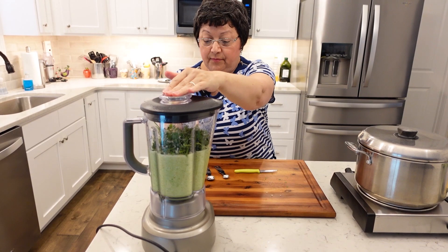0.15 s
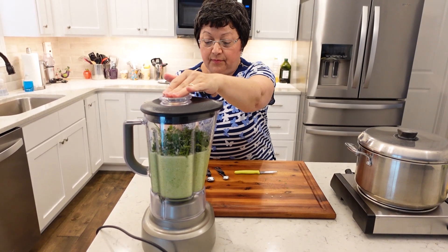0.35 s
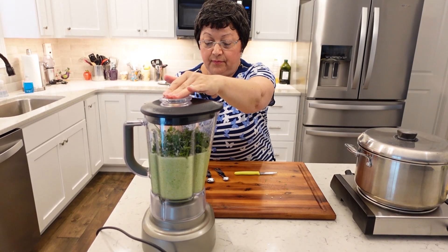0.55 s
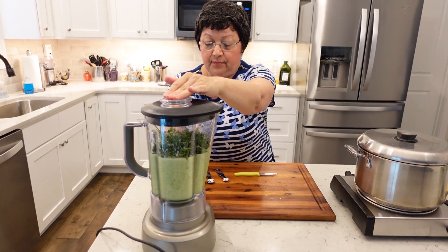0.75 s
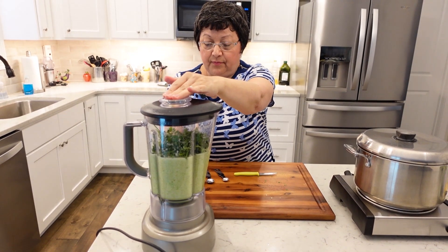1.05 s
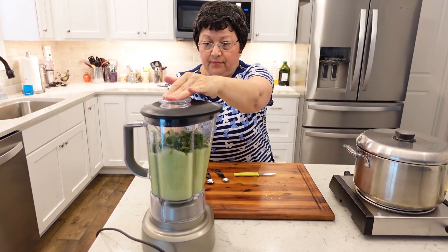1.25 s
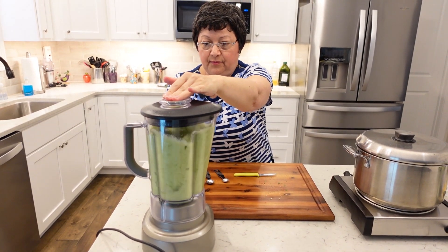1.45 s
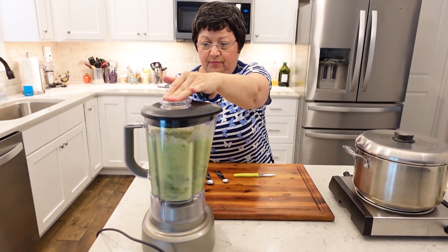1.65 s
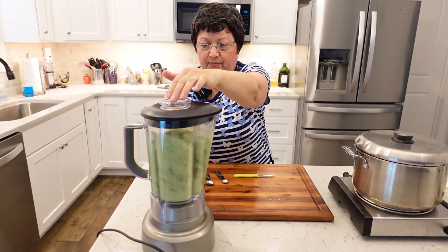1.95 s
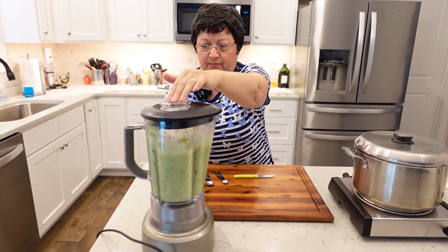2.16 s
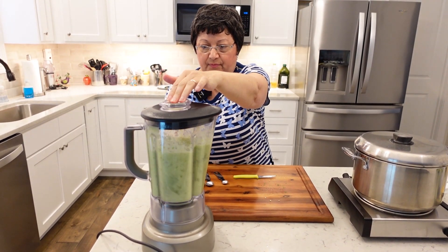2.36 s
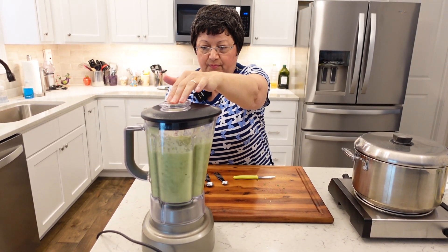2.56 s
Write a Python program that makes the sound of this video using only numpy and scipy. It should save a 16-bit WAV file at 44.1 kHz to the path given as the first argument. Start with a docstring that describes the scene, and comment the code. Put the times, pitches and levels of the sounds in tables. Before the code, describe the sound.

A blender chops wet greens in a kitchen. Soft ventilation murmur and faint hiss until two plastic clicks at 1.0 and 1.1 seconds, the second doubled. At 1.18 the drive knocks in abruptly; rough chopping growls in bursts with gulps and gurgles. Hard knocks and cracks crowd around 1.9 to 2.15, then brighter, steadier churning, splashing spray and a growing motor tone continue to the end.

```python
"""A blender chopping in a kitchen

Over ventilation murmur come two plastic clicks, the second a close pair; then the drive knocks in and blades chop.
Chopping, spray and gulps are filtered random impulses with short rattles; the jar's resonances ring along.
Trapped air rings as gliding sines, hard chunks knock and crack, and motor tones grow. Clumps growl one by one,
then the mash circulates and the sound evens out. A short room tail surrounds most of the sources."""
import sys
import numpy as np
from scipy import signal
from scipy.fft import rfft, irfft
from scipy.io import wavfile
from scipy.ndimage import uniform_filter1d

SR = 44100
rng = np.random.default_rng(int(sys.argv[2]) if len(sys.argv) > 2 else 0)


def put_to_file(sound):
    """Save the sound as 16-bit audio at rate SR, in the file named by the first command-line argument."""
    columns = np.atleast_2d(sound).T  # one column per channel
    safe = np.clip(columns, -1, 1)
    whole_steps = np.round(safe * 32767)
    wavfile.write(sys.argv[1], SR, whole_steps.astype(np.int16))


N = 119070
T = np.arange(N) / SR  # time [s]
START_S = 1.183  # the drive takes up its slack
THIN_S = 2  # the mash begins to thin
RATTLE_S = 0.0039  # amplitude decay time of the rattle after a blow
EAR_LAG_S = 0.001053  # the right microphone hears direct blows later
WET_DB = -5.5  # usual level of the kitchen's tail

# Spectral shape of a hard blow on the drive: (frequency [Hz], relative level [dB])
KNOCK_SHAPE = [(250, -20), (800, -0.5), (1700, 2.5), (2400, -12.5), (3200, -28), (16000, -47)]
# Spectral shape of spray and cracks: (frequency [Hz], relative density [dB per Hz])
SPRAY_SHAPE = [(400, -39.5), (1500, -1), (2800, 0.5), (3500, -6), (4700, -8.5), (7000, -16), (10800, -21.5),
               (16000, -39.5)]


def amp(db):
    """Logarithmic level: decibels become an amplitude gain."""
    return 10 ** (np.asarray(db) / 20)


def unit(x):
    """Normalisation by mean power: scales to rms 1."""
    return x / np.sqrt(np.mean(x ** 2) + 1e-20)


def read(points, hz):
    """Linear interpolation of a table on a log-frequency axis."""
    f, value = np.transpose(points)
    return np.interp(np.log(hz + 1), np.log(f + 1), value)


def conv(x, h):
    """Linear superposition: convolves along time, cut to the scene's length."""
    return signal.fftconvolve(np.atleast_2d(x), np.atleast_2d(h), axes=1)[:, :N]


def colour(x, shape, size=4096):
    """Minimum-phase filtering: the log gain's Hilbert transform gives the phase; impulse energy is 1."""
    hz = abs(np.fft.fftfreq(size, 1 / SR))
    log_gain = np.log(amp(shape(hz)))
    response = np.exp(np.conj(signal.hilbert(log_gain)))
    h = np.fft.ifft(response).real
    return conv(x, h / np.linalg.norm(h))


def tinted(x, points):
    """Source-filter principle: shapes x by the spectrum in a table."""
    return colour(x, lambda hz: read(points, hz))


def resonate(x, hz, width):
    """A damped second-order resonance with peak gain 1."""
    b, a = signal.iirpeak(hz, hz / width, fs=SR)
    return signal.lfilter(b, a, x)


def steadied(x, size=1500):
    """Short-time power normalisation: removes slow level drift and keeps the grain."""
    power = (x ** 2).mean(0)
    local_power = abs(uniform_filter1d(power, size))
    return x / np.sqrt(local_power + 1e-4 * np.mean(x ** 2))


def grains(per_s, spread_db):
    """Shot noise: impulses at random times, of random sign and uneven size."""
    hits = rng.random(N) < per_s / SR
    signs = rng.choice([-1, 1], N)
    return hits * signs * amp(spread_db * np.minimum(rng.exponential(1, N), 4))


def scatter(x, direct, decay_s=RATTLE_S):
    """Direct and diffuse sound: a spike, later and weaker on the right, plus a decaying noise rattle."""
    r = np.exp(-2 / (decay_s * SR))  # power decays twice as fast as amplitude
    power = signal.lfilter([1 - r], [1, -r], x ** 2 + 1e-20)
    rattle = np.sqrt(power) * rng.standard_normal((2, N))
    spike = direct * np.array([[1], [.7]])
    left_right = np.array([x, np.roll(x, round(EAR_LAG_S * SR))])
    return (rattle + spike * left_right) / np.sqrt(1 + spike ** 2)


def impulses(rows):
    """Ideal impulsive excitation: one impulse for each (time [s], level [dB]) row."""
    x = np.zeros(N)
    for s, db in rows:
        x[round(s * SR)] += amp(db)
    return x


def room(x, wet_db=WET_DB):
    """Diffuse reverberation: noise tails whose bands each decay at their own speed."""
    # Reverberation time of the kitchen: (frequency [Hz], T60 [s])
    room_t60 = [(400, 0.21), (5000, 0.37), (16000, 0.07)]
    hz, t, z = signal.stft(rng.standard_normal((2, 2, SR // 2)), SR, nperseg=256)
    decay = amp(-60 * t / read(room_t60, hz)[:, None])
    onset = np.minimum(t / 0.0083, 1)
    tails = signal.istft(z * decay * onset, SR, nperseg=256)[1]
    turn = 2 * np.pi * T  # two tails take turns so that the room does not stand still
    wet = conv(x * np.cos(turn), tails[0]) + conv(x * np.sin(turn), tails[1])
    return x + amp(wet_db) * wet / np.linalg.norm(tails[0, 0])


def jar(x):
    """Forced vibration: jar and base ring along with whatever shakes them."""
    # Resonances of jar and base: (frequency [Hz], width [Hz], gain [dB])
    jar_modes = [(231, 21, 3.5), (506, 84, 6), (889, 16, 2.5), (1014, 70, -6.5), (1246, 64, -4.5),
                 (2700, 140, -13), (4400, 350, -12), (8020, 690, -0.5)]
    return x + sum(amp(db) * resonate(x, hz, width) for hz, width, db in jar_modes)


def level(column):
    """Addition of powers: one part's steady bed plus a swell for each clump (1 gulps, 2 chopping, 3 spray)."""
    # Steady bed of the churn: (time [s], gulp gain [dB], chopping gain [dB], spray gain [dB])
    churn = [(1.185, -68, -48, -57), (1.23, -47, -23.5, -41.5), (1.87, -33, -24, -38),
             (2.09, -35, -19, -29), (2.4, -34.5, -20.5, -32.5), (2.7, -32.5, -21.5, -32.5)]
    # Clumps drawn into the blades, each a short growl:
    # (peak time [s], fall time [s], gulp gain [dB], chopping gain [dB], spray gain [dB])
    clumps = [(1.233, 0.04, -28, -16.5, -31), (1.355, 0.049, -24.5, -21.5, -35),
              (1.55, 0.049, -35.5, -20.5, -36), (1.68, 0.041, -23.5, -18, -32),
              (1.962, 0.07, -23, -19, -34), (2.535, 0.033, -37, -20.5, -42)]
    rise_share, roundness = 0.49, 1.51  # rise as a share of the fall; 1 = pointed, 2 = round
    rows = np.array(churn)
    power = amp(np.interp(T, rows[:, 0], rows[:, column])) ** 2
    for s, fall_s, *parts_db in clumps:
        age = np.where(T < s, (s - T) / (rise_share * fall_s), (T - s) / fall_s)
        power = power + amp(parts_db[column - 1]) ** 2 * np.exp(-age ** roundness)
    return np.sqrt(power) * np.clip((T - START_S) / 0.0027, 0, 1)


def background():
    """Stationary broadband noise: ventilation murmur, partly common to both sides, and a fading hiss."""
    # Spectral shape of the kitchen murmur: (frequency [Hz], relative density [dB per Hz])
    air_shape = [(50, -10.5), (90, -11.5), (145, -0.5), (200, -10.5), (290, -2.5), (400, -9), (530, -1),
                 (700, -12), (1240, -17), (2400, -31), (15500, -46.5)]
    air_db = -50
    hiss_hz, hiss_db, hiss_fade_db_per_s = 4600, -61.5, 7
    air = tinted(rng.standard_normal((2, N)) + 0.34 * rng.standard_normal(N), air_shape)
    hiss = resonate(rng.standard_normal((2, N)), hiss_hz, hiss_hz)
    return amp(air_db) * unit(air) + amp(hiss_db - hiss_fade_db_per_s * T) * hiss


def clicks():
    """Impact and modal ringing: hard plastic snaps, and the parts buzz briefly afterwards."""
    # Plastic snaps: (time [s], impulse level [dB], treble tilt [dB per octave], ring gain [dB])
    snaps = [(1.0201, -13.5, -1.7, -19), (1.0886, -14.5, 2, -1.5), (1.0909, -13, -1, -14)]
    # Spectral shape of a snap before its tilt: (frequency [Hz], relative level [dB])
    snap_shape = [(150, -22), (600, -5), (880, 1.5), (1550, -2.5), (2150, -12), (4400, -10), (10300, -15),
                  (16000, -37)]
    # Modes of the plastic parts: (frequency [Hz], relative gain [dB])
    plastic_modes = [(1010, 9), (1470, 2), (2380, -2), (3470, -2), (4400, -10), (6700, -3), (8000, 5)]
    q = 42  # each mode's frequency over its width
    buzz_t60_s = 0.096  # decay of the noise that excites the modes
    buzz = rng.standard_normal(SR // 3) * amp(-60 * T[:SR // 3] / buzz_t60_s)
    ring = sum(amp(db) * resonate(buzz, hz, hz / q) for hz, db in plastic_modes)
    out = 0
    for s, db, tilt_db, ring_db in snaps:
        x = scatter(impulses([(s, db)]), decay_s=0.0026, direct=0.59)
        out = out + colour(x, lambda hz: read(snap_shape, hz) + tilt_db * np.log2(hz + 1))
        out = out + amp(ring_db) * conv(x, ring / np.linalg.norm(ring))
    return room(out)


def knock():
    """Impact excitation: the drive coupling snaps tight."""
    x = scatter(impulses([(START_S, 4.5)]), decay_s=0.0035, direct=1.1)
    return room(tinted(x, KNOCK_SHAPE), wet_db=1)


def chopping():
    """Random impacts on a resonator: blades meet pieces, shreds patter, and the tone rises as the mash thins."""
    # Spectral shape of the blows: (frequency [Hz], relative density [dB per Hz])
    chop_shape = [(60, -40.5), (270, -11), (400, -2.5), (740, -3), (1400, -6), (1950, -9), (2600, -19.5),
                  (8000, -37), (16000, -50)]
    blows = unit(grains(per_s=300, spread_db=1.5))
    patter = unit(grains(per_s=1500, spread_db=-0.5))  # shreds on the wall between the blows
    x = jar(tinted(scatter(blows + amp(-4.0) * patter, direct=1.12), chop_shape))
    thin = np.clip((T - THIN_S) / 0.044, 0, 1)
    x = x + thin * amp(-4.0) * resonate(x, 1043, width=560)
    return amp(1.5) * level(2) * steadied(room(x), size=1800)


def gulps():
    """Cavity collapse as shot noise: air pockets close around the blades with short low booms."""
    # Spectral shape of the booms: (frequency [Hz], relative density [dB per Hz])
    gulp_shape = [(62, -25.5), (115, -4), (200, -6), (350, -9), (800, -29), (3000, -83)]
    x = tinted(scatter(grains(per_s=160, spread_db=1.5), direct=1.93), gulp_shape)
    return level(1) * steadied(room(x))


def spray():
    """Dense shot noise: fine drops and cut fibres crackle against the jar."""
    x = jar(tinted(scatter(grains(per_s=3500, spread_db=4.0), direct=0.43), SPRAY_SHAPE))
    return amp(3.5) * level(3) * steadied(room(x))


def bubbles():
    """Damped bubble oscillation: trapped air rings at random pitches, a gurgle that fades as the mash thins."""
    per_s, low_hz, high_hz = 70, 232.7, 887
    decay_cycles = 3.36
    t, out = T[:SR // 12], np.zeros((2, N + SR))
    for when, size, pitch, glide, phase in rng.random((round(per_s * N / SR), 5)):
        hz = low_hz * (high_hz / low_hz) ** pitch
        turns = hz * t * (1 + (glide - .5) * t / .06)  # pitch glides up or down
        ring = size * (1 - np.exp(-turns)) * np.exp(-turns / decay_cycles)
        # the right side has its own phase
        out[:, int(when * N):][:, :len(t)] += ring * np.sin(2 * np.pi * (turns + [[0], [phase - .5]]))
    fade_db = -7 * np.clip((T - THIN_S) / 0.067, 0, 1)
    loudness = np.sqrt(level(1) * level(2))  # midway between gulps and chopping
    return amp(fade_db - 2.0) * loudness * steadied(room(out[:, :N]), size=4000)


def motor():
    """Frequency-modulated tones: they waver together and grow as the load eases."""
    # Motor tones once it runs freely: (frequency [Hz], rms level [dB])
    hum = [(226, -41), (1292, -37)]
    drift = uniform_filter1d(rng.standard_normal(N), 3000)
    waver = unit(uniform_filter1d(drift, 1500))
    turns = np.cumsum(1 + 0.0072 * waver) / SR
    tones = sum(amp(db) * np.sin(2 * np.pi * (hz * turns + rng.random())) for hz, db in hum)
    return np.sqrt(2) * tones * np.clip((T - START_S) / 1.17, 0, 1)


def chunks():
    """Impact excitation: hard pieces knock on the drive and ring the jar; some crack sharply."""
    # Hard pieces hit by a blade: (time [s], thump impulse [dB], crack impulse [dB])
    pieces = [(1.201, 0.5, -26), (1.222, 0, -18), (1.479, -3, -1), (1.809, 3.5, -26), (1.932, 5, 0),
              (1.951, 9.5, -21), (1.972, 7.5, 1.5), (2.021, 6.5, 0), (2.145, 3, -4)]
    thumps = scatter(impulses([(s, db) for s, db, _ in pieces]), decay_s=0.0041, direct=0.13)
    cracks = scatter(impulses([(s, db) for s, _, db in pieces]), direct=0.49)
    return room(jar(tinted(thumps, KNOCK_SHAPE)) + tinted(cracks, SPRAY_SHAPE))


def glugs():
    """Air-pocket resonance: each rings once, rising slightly in pitch; the higher, the shorter."""
    # Big air pockets, smaller and higher once the mash thins:
    # (time of peak [s], pitch at peak [Hz], peak level before the room [dB])
    pockets = [(1.239, 365, -13.5), (1.558, 264, -24.5), (1.637, 490, -15), (1.992, 319.7, -18.5),
               (2.07, 1130, -16.5), (2.152, 497, -17), (2.219, 1203, -17), (2.27, 1210, -15.5),
               (2.352, 988, -14.5), (2.528, 1052, -13), (2.671, 1076, -17.5)]
    swell_cycles = 4.7  # cycles they take to swell and to fade
    out = 0
    for s, hz, db in pockets:
        age = (T - s) * hz / swell_cycles
        turns = np.cumsum(hz * (1 + .06 * np.tanh(age))) / SR + rng.random()
        out = out + amp(db) * np.exp(-age ** 2) * np.sin(2 * np.pi * turns)
    return room(out, wet_db=-8)


def squeak():
    """Narrow-band noise under a Gaussian envelope: one tiny, very high squeak."""
    peak_s, hz, width_hz = 1.608, 14500, 1500
    once = resonate(rng.standard_normal(N), hz, width_hz)
    tone = unit(resonate(once, hz, width_hz))
    return amp(-49) * np.exp(-((T - peak_s) / 0.0028) ** 2) * tone


def scene():
    """Superposition with interaural level differences: the blender stands left of the middle."""
    # Balance of the blender: (frequency [Hz], left minus right [dB])
    balance = [(80, 6), (500, 5.5), (780, 4), (1200, 5.5), (1800, 1.5), (2750, -4.5), (4200, 3),
               (12000, 3.5)]
    blender = knock() + chopping() + gulps() + spray() + bubbles() + motor() + chunks() + glugs() + squeak()
    lean_db = read(balance, np.fft.rfftfreq(N, 1 / SR)) / 2
    blender = irfft(rfft(blender) * amp([lean_db, -lean_db]), N)
    return background() + clicks() * amp([[1.5], [-1.5]]) + blender


def record(dry):
    """Band-limited transduction: microphone low cut, full-scale limit, then the upper band limit."""
    x = signal.lfilter(*signal.butter(4, 48, "highpass", fs=SR), dry)
    band_limit = signal.firwin(511, 15850, window=("kaiser", 9), fs=SR)  # cutoff in Hz
    return signal.oaconvolve(np.clip(x, -1, 1), band_limit[None], "same")


dry = scene()
out = record(dry)
put_to_file(out)
```